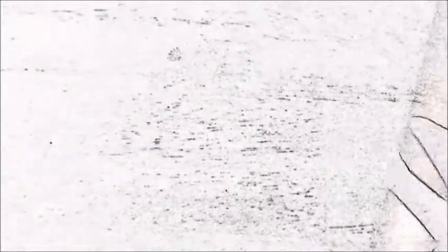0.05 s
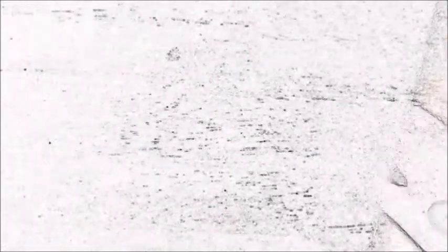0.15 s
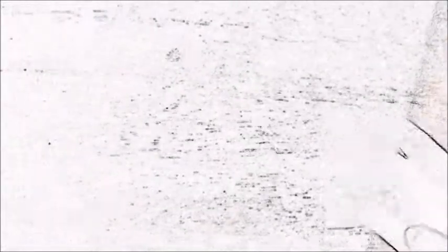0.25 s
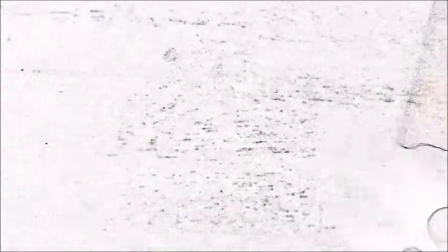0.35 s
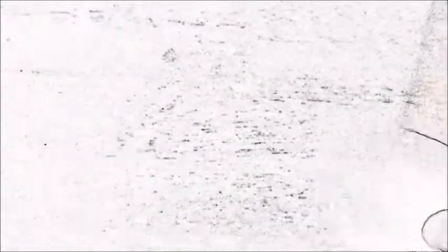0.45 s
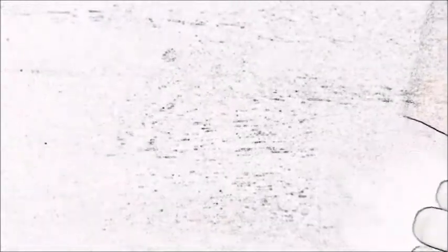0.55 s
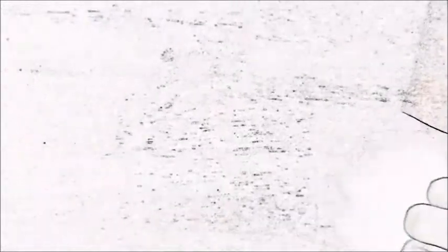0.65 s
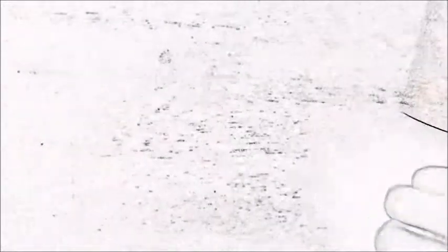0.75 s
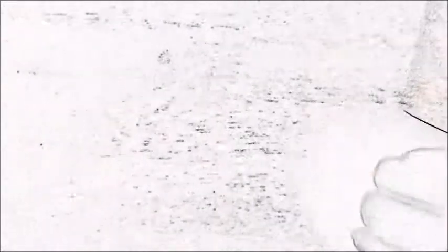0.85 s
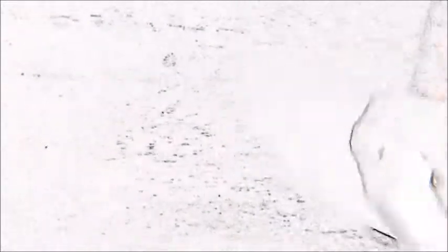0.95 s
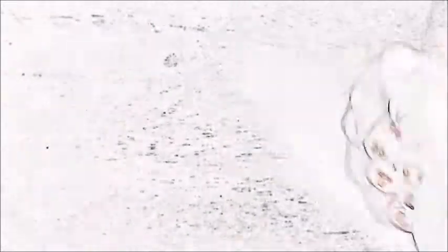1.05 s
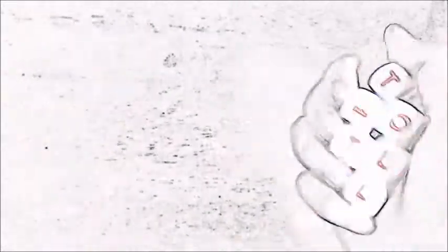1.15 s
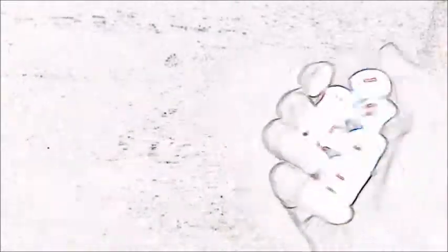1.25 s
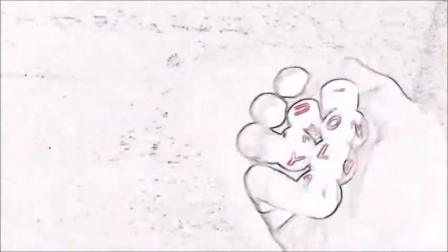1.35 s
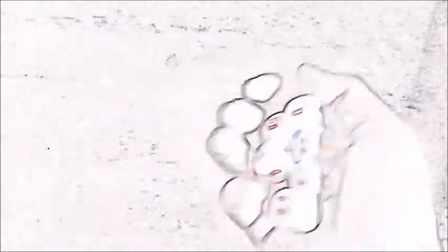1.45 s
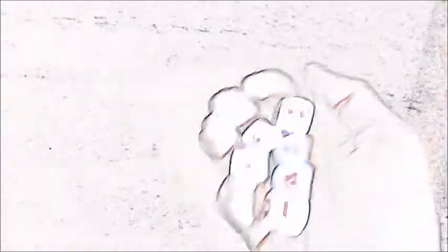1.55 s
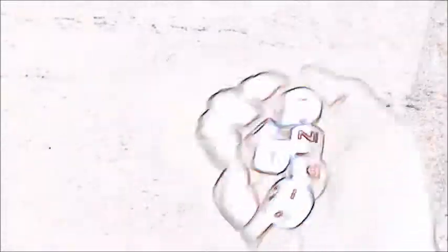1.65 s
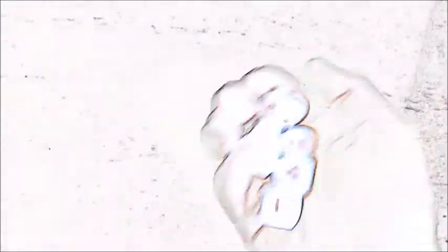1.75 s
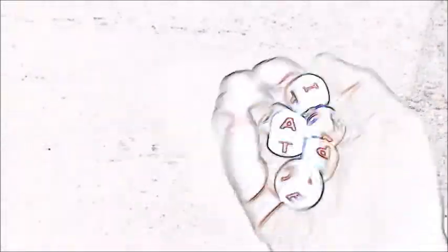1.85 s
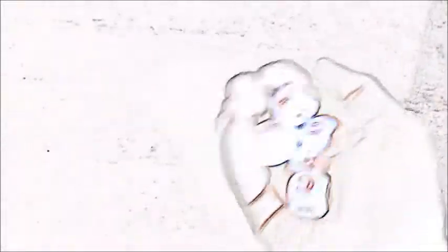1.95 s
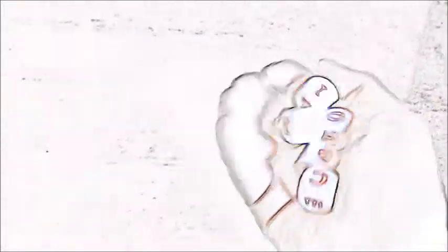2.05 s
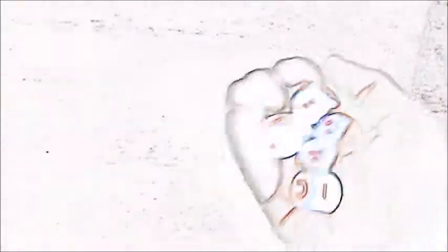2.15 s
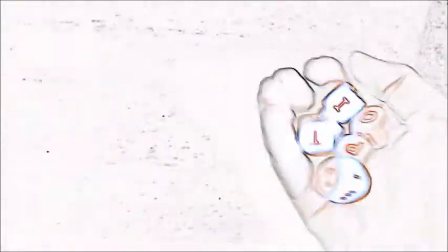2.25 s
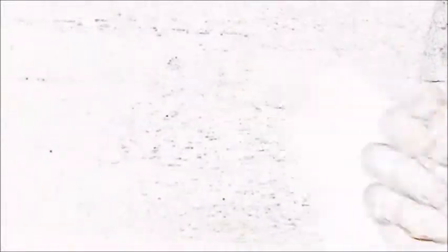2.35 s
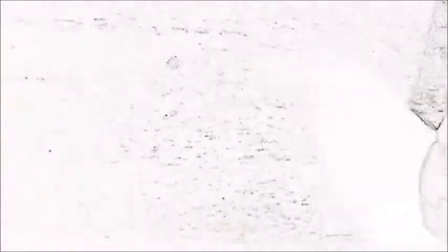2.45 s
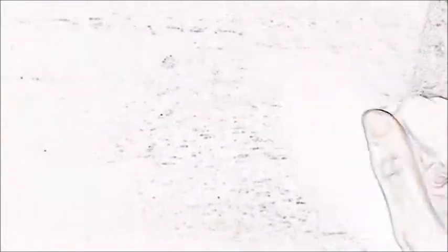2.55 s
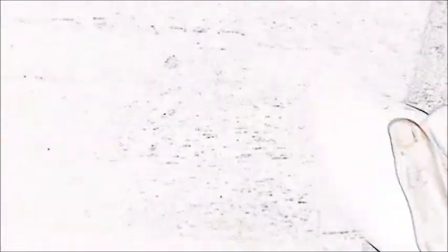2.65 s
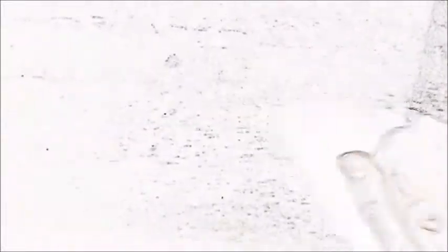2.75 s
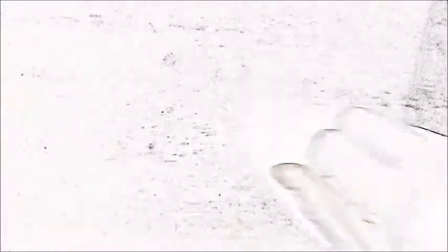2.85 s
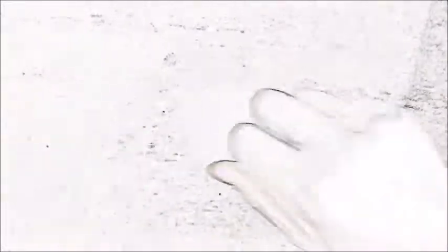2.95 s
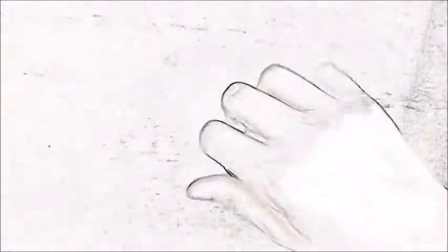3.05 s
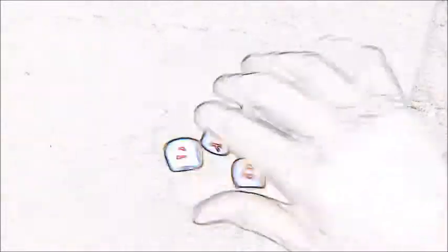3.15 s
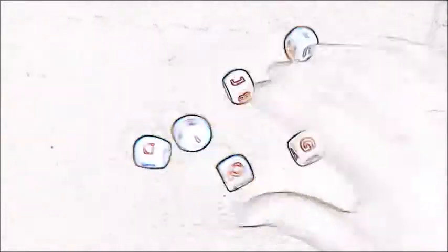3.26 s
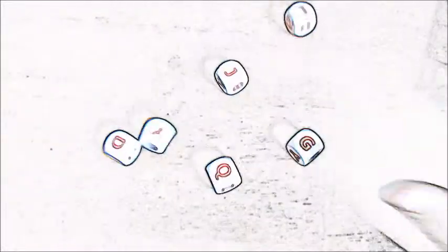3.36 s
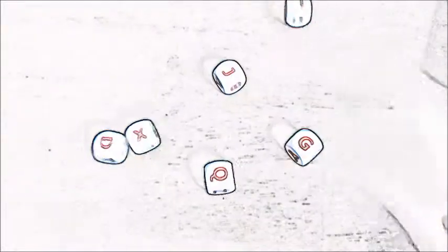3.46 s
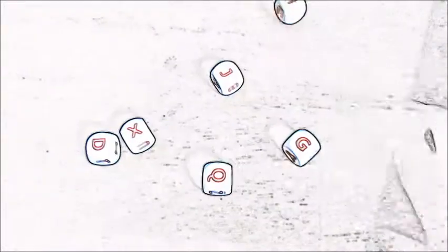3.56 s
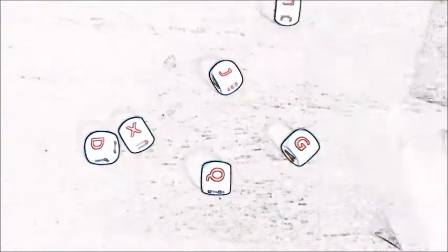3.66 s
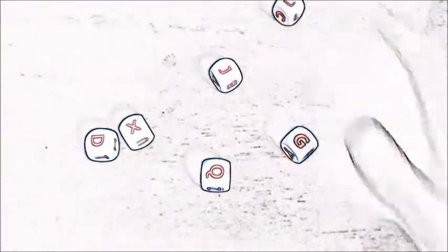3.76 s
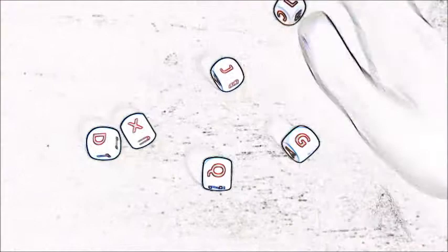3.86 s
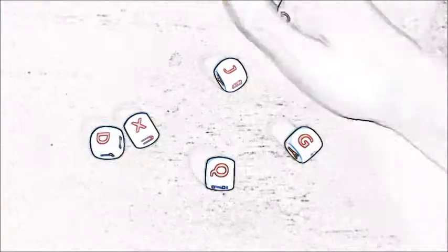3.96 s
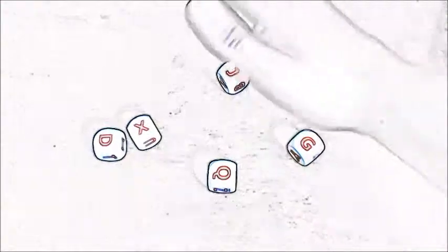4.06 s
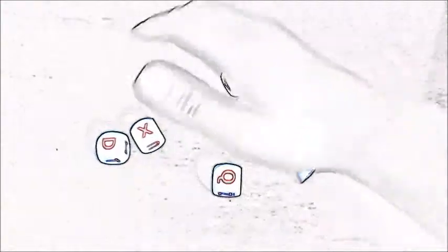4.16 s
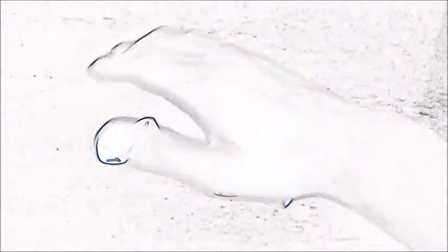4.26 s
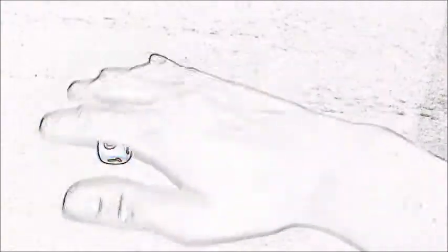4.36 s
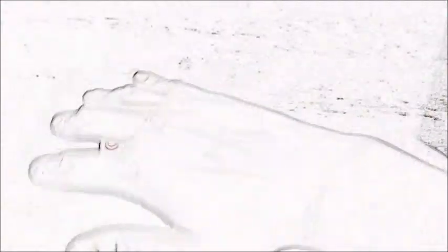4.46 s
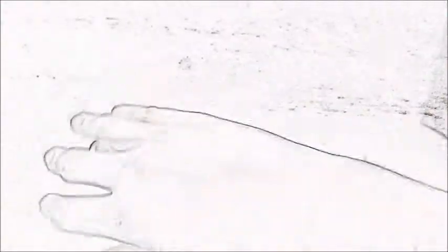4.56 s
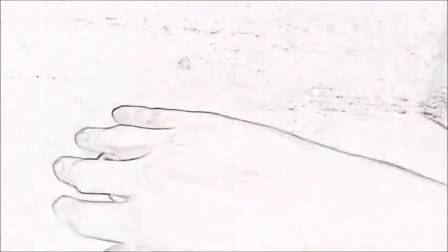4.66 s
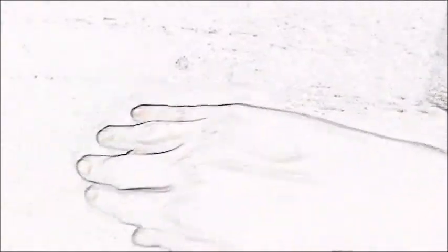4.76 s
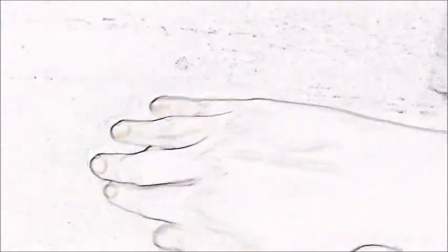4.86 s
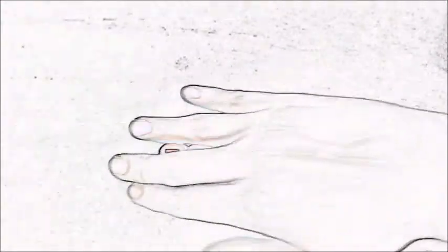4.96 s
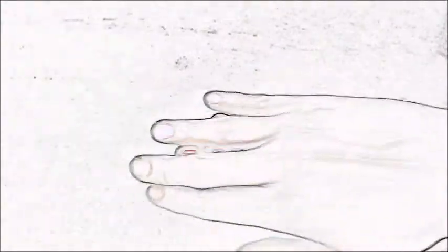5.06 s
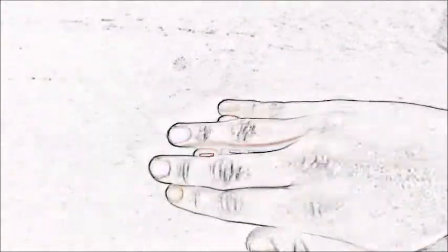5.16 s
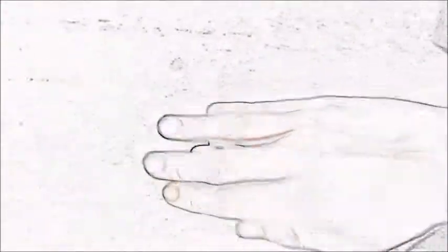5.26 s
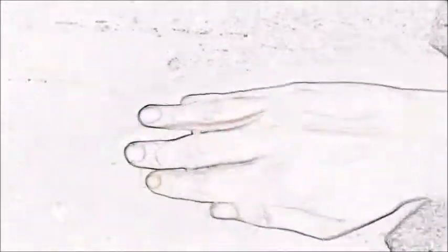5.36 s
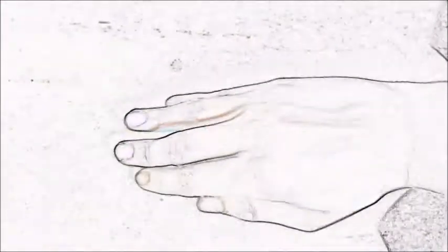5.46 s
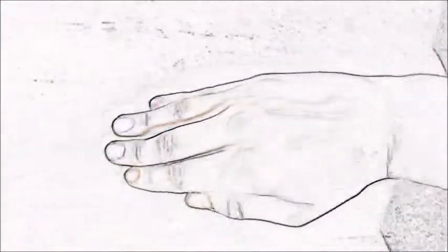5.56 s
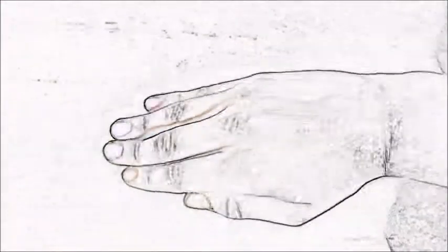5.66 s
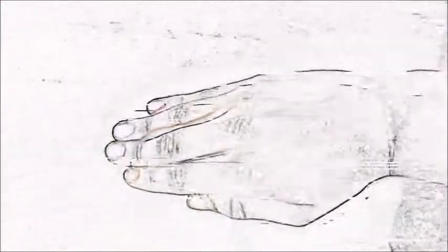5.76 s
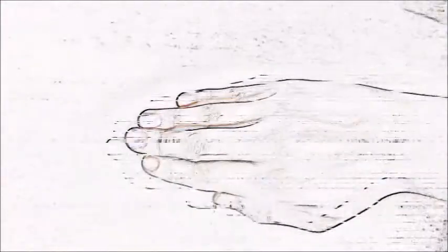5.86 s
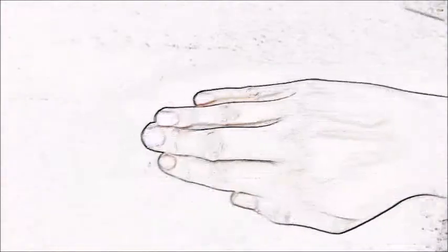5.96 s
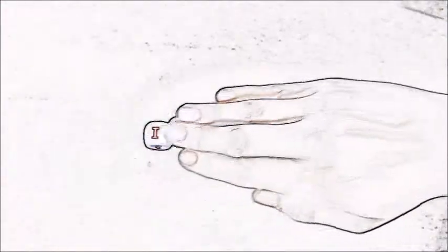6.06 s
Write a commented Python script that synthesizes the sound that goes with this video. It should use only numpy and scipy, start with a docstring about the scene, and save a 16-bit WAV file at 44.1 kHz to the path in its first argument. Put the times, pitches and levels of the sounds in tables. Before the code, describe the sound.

Small hard dice are scooped up, rattled brightly in a palm, thrown clattering onto a wooden table, then swept together and slid about under a hand.

```python
"""Small hard dice, close and indoors: scooped up, rattled in the palm, thrown on a wooden table,
then swept together and slid about under a flat hand. Clicks are short pitched wavelets, table hits
are decaying wood modes with noise bursts, and sliding is uneven noise ringing the same modes.
Skin rub, soft bumps, room air, a low rumble and thin whines lie behind; near the end, right after
an abrupt click, the level dips briefly."""
import sys
import numpy as np
from scipy import signal
from scipy.fft import rfft, irfft, next_fast_len
from scipy.io import wavfile
from scipy.ndimage import uniform_filter1d, map_coordinates

SR = 44100
rng = np.random.default_rng(int(sys.argv[2]) if len(sys.argv) > 2 else 0)


def transcribe(signal):
    """Save signal, clipped to [-1, 1], as a 16-bit WAV file at the path in sys.argv[1]."""
    frames = np.atleast_2d(signal).T
    limited = np.clip(frames, -1, 1)
    pcm = np.round(limited * 32767).astype(np.int16)
    wavfile.write(sys.argv[1], SR, pcm)


N = 269892
TIME = np.arange(N) / SR  # seconds
CRACK_HZ = 12000  # the hardest part of a contact


def amp(db):
    """Decibels to a linear gain."""
    return 10 ** (np.asarray(db) / 20)


def unit(x):
    """Scale a signal to an rms of 1."""
    return x / np.sqrt(np.mean(x ** 2) + 1e-20)


def along(points, hz):
    """Read (Hz, value) points along a log frequency axis."""
    point_hz, value = np.transpose(points)
    return np.interp(np.log(hz + 1), np.log(point_hz + 1), value)


def curves(rows):
    """One value per sample for each column; the first, a level, is silent outside the rows."""
    s, level, *columns = np.transpose(rows)
    level_curve = np.interp(TIME, s, level, -150, -150)
    return [level_curve] + [np.interp(TIME, s, column) for column in columns]


def wobble(rate):
    """A smooth random curve with rate knots a second."""
    knots = rng.standard_normal(int(N * rate / SR) + 4)
    return map_coordinates(knots, [TIME * rate])


def filtered(x, response):
    """Shape the spectrum of x by a response of frequency."""
    size = next_fast_len(N + SR // 2)
    hz = np.fft.rfftfreq(size, 1 / SR)
    return irfft(rfft(x, size) * response(hz), size)[..., :N]


def coloured(x, spectrum):
    """Filter x through (Hz, dB) points and scale it to an rms of 1."""
    return unit(filtered(x, lambda hz: amp(along(spectrum, hz))))


def above(hz, edge_hz):
    """A steep high-pass response."""
    return 1 / (1 + (edge_hz / (hz + 1)) ** 8)


def wavelets(s, hz, gain, turns):
    """Short pitched bursts around the times s: a bell-shaped swell, some turns of the pitch wide."""
    at = np.round(s * SR).astype(int)[:, None] + np.arange(-100, 100)
    cycles = (at / SR - s[:, None]) * hz[:, None]
    phase = rng.uniform(0, 2 * np.pi, (len(s), 1))
    swell = gain[:, None] * np.exp(-(cycles / turns) ** 2)
    wave = swell * np.cos(2 * np.pi * cycles + phase)
    return np.bincount(at.ravel(), wave.ravel(), N + 200)[:N]


def burst(t, hz, t60, size):
    """A dying puff of noise around one pitch; a larger grain size narrows it."""
    grain = np.hanning(size) * np.cos(2 * np.pi * hz * np.arange(size) / SR)
    noise = amp(-60 * t / t60) * rng.standard_normal(len(t))
    return np.convolve(noise, grain / np.linalg.norm(grain))[:len(t)]


# Room reverb. Each row: frequency in Hz, time to fall 60 dB in seconds.
ROOM_DECAY = [(300, 0.39), (2000, 0.22), (9000, 0.13)]


def room(x):
    """Each frequency of the room's answer dies at its own speed; every tenth of a second has its own tail."""
    out, step = np.zeros(N + SR), SR // 10
    for a in range(0, N, step):
        hz, t, noise = signal.stft(rng.standard_normal(SR // 4), SR, nperseg=128)
        decay = amp(-60 * t / along(ROOM_DECAY, hz)[:, None])
        tail = signal.istft(noise * decay, SR, nperseg=128)[1]
        wet = signal.fftconvolve(x[a:a + step], tail / np.linalg.norm(tail))
        out[a + 40:][:len(wet)] += wet  # 40 samples after the direct sound
    return out[:N]


# Colour of the room air. Each row: frequency in Hz, relative level in dB.
AIR_SPECTRUM = [(88, -13.5), (150, -18), (314, -23.5), (352, -18.5), (572, -22.5), (736, -22.5),
                (1200, -17.5), (1570, -34), (10500, -43), (11800, -42.5), (15500, -42)]
# Colour of the low rumble. Each row: frequency in Hz, relative level in dB.
RUMBLE_SPECTRUM = [(12, -33.5), (20, 8), (52, -5), (86, -12.5), (178, -15), (214, -17), (300, -17),
                   (390, -67), (660, -120)]
# Swell of the rumble. Each row: time in seconds, level in dB.
RUMBLE_LEVEL = [(0.0, -48), (0.17, -44), (1.35, -46.5), (1.45, -53.5), (2.5, -52.5), (3.1, -51.5),
                (3.22, -73), (3.55, -65), (3.8, -55.5), (4.19, -58), (5.1, -50), (5.83, -49.5), (5.9, -43),
                (6.12, -43.5)]
# Thin steady tones. Each row: pitch in Hz, level in dB before the swell, start in seconds.
WHINES = [(11795, -79, 0), (14739, -73.5, 5.85)]
AIR_DB = -60
# the whines swell with the rumble: dB per dB over the calm level
WHINE_FOLLOWS, CALM_DB = 0.35, -47


def background():
    """Room air and a wavering low rumble of filtered noise, with thin electrical whines as sines."""
    air = amp(AIR_DB) * coloured(rng.standard_normal(N), AIR_SPECTRUM)
    rumble_db, = curves(RUMBLE_LEVEL)
    rumble = amp(rumble_db) * coloured(rng.standard_normal(N), RUMBLE_SPECTRUM)
    tones = np.zeros(N)
    for hz, db, start in WHINES:
        tones += np.sqrt(2) * amp(db) * np.sin(2 * np.pi * hz * TIME) * (TIME >= start)
    return air + rumble + amp(WHINE_FOLLOWS * (rumble_db - CALM_DB)) * tones


# Skin rubbing. Each row: time in seconds, relative level in dB.
SKIN_LEVEL = [(0.0, -64.5), (0.44, -57), (0.59, -47), (0.94, -62), (1.26, -64), (1.36, -54.5), (1.6, -64),
              (1.82, -55.5), (2.5, -57), (2.75, -75), (3.1, -59), (3.4, -55), (3.75, -91), (4.1, -57.5),
              (4.71, -63), (5.3, -65.5), (5.45, -50.5), (5.63, -63), (6.12, -64.5)]
# Colour of the rub. Each row: frequency in Hz, relative level in dB.
SKIN_SPECTRUM = [(880, -34), (1500, -9), (1810, -6), (1940, -12), (2940, -11.5), (3410, -15.5), (5540, -12),
                 (16000, -37.5)]


def skin():
    """Fingers rub on dice and wood: a slightly uneven hiss."""
    grain = rng.standard_normal(N) * amp(wobble(160))
    return amp(curves(SKIN_LEVEL)[0] + 1) * coloured(grain, SKIN_SPECTRUM)


# Soft hand bumps on the table. Each row: start in seconds, level in dB, pitch in Hz,
# time to fall 60 dB in seconds, scuff level in dB.
HAND_BUMPS = [(.140, -37, 318, 0.14, -42), (0.143, -44.5, 984, 0.28, -59), (0.157, -36, 116, 0.11, -41),
              (0.315, -30.5, 94, 0.034, -71), (0.328, -30, 315, 0.06, -46),
              (0.759, -39.5, 305, 0.11, -36.5), (.797, -33, 646, 0.032, -39.5),
              (1.039, -39, 394, 0.15, -43.5), (5.718, -29, 680, 0.033, -58), (5.735, -31, 885, 0.055, -45),
              (5.752, -33.5, 477, 0.15, -56)]


def bumps():
    """A soft hand wakes one low tone at a time, blurred by a dull puff, with a small scuff on top."""
    out, t = np.zeros(N + SR), np.arange(SR // 5) / SR
    for s, db, hz, t60, scuff_db in HAND_BUMPS:
        soft_start = 1 - np.exp(-t / 0.00067)
        thud = amp(-60 * t / t60) * np.sin(2 * np.pi * hz * t) * soft_start
        puff = amp(-16.5) * burst(t, 0.94 * hz, 3.8 * t60, size=61)
        scuff = amp(scuff_db) * burst(t, 2270, 0.025, size=25)
        out[round(s * SR):][:len(t)] += amp(db) * (thud + puff) + scuff
    return out[:N]


# Table-top modes, for drags and blows alike. Each row: pitch in Hz, relative level in dB,
# time to fall 60 dB in seconds when free of the hand.
TABLE_MODES = [(234, -18.5, 0.21), (333.9, -11, 0.34), (399, -18, 0.071), (509, -16.5, 0.056),
               (733, -18, 0.029), (994, -10, 0.22), (1226.5, -9.5, 0.12), (1584, -8, 0.055),
               (1767, 2.5, 0.029), (1810, -9.5, 0.034), (1864, -19, 0.13), (2443, -15, 0.11),
               (2417, -9.5, 0.078), (2650, -10.5, 0.1), (2910, -4.5, 0.057), (3100, 1, 0.05),
               (3650, -12.5, 0.15), (3650, -3, 0.023), (4200, -42, .06), (4410, -8.5, 0.0079),
               (5240, -7, 0.036), (5470, -12.5, 0.02)]


def wood(hz, ring, spot_db):
    """The table's modes as resonances, weighted for one spot; a hand on the top shortens the ring."""
    response = 0
    for k, (mode_hz, db, t60) in enumerate(TABLE_MODES):
        width = np.log(1000) / (np.pi * t60 * ring)
        resonance = 1j * hz * width / (mode_hz * mode_hz - hz * hz + 1j * hz * width)
        response = response + (-1) ** k * amp(db + spot_db[k]) * resonance
    return response


# Drags on the wood; neighbouring rows that meet in time are stretches of one continuous drag.
# Each row: a level curve of (time in seconds, level in dB), then bass, hollow tone and treble
# in dB over that level, the treble before it follows the strength.
DRAGS = [ ([(0.12, -62), (0.142, -59.5), (0.306, -81)], 2.6, 0, -1.1), ([(0.39, -65), (0.448, -49),
         (0.484, -51.5), (0.54, -43.5), (0.62, -48), (0.72, -67)], 0, 0, 8), ([(2.968, -56), (3.035, -54.5),
         (3.05, -68)], -19, -16, 3.7), ([(3.1, -39.5), (3.254, -37.5), (3.382, -34.5), (3.5, -36)],
         -1, -23, 0), ([(3.5, -41), (3.72, -49), (3.842, -46.5), (3.94, -66.5)], -0.29, -8, 6.6),
         ([(4.05, -76), (4.09, -48), (4.182, -49), (4.266, -38), (4.33, -38.5), (4.44, -44.5)],
         -10, -14, -2.3), ([(4.44, -36.5), (4.5, -44.5), (4.58, -34), (4.66, -37.5), (4.72, -36.5),
         (4.834, -33.5), (4.94, -39.5), (5.04, -44)], -10.5, -19.5, -9.5), ([(5.04, -45.5), (5.118, -35.5),
         (5.2, -39), (5.244, -48.5), (5.3, -42.5), (5.35, -51)], -13.5, -18.5, -9.5), ([(5.35, -43),
         (5.396, -38.5), (5.43, -44.5), (5.46, -34.5), (5.54, -38.5), (5.706, -49.5), (5.76, -49)],
         -7, -11, -9.5), ([(5.85, -40), (5.91, -48.5), (6.12, -65.5)], -6.5, -24, 1)]
# Colour of the gritty hiss. Each row: frequency in Hz, relative level in dB.
GRIT_SPECTRUM = [(290, -53), (500, -17.5), (782, -16.5), (961, -3.5), (1500, -1), (1780, -13.5),
                 (1960, -9.5), (2440, -2.5), (3180, -14.5), (3460, -15), (4050, -10.5), (9000, -36),
                 (11700, -63), (19800, -120)]
# a stronger drag is brighter: extra treble dB per dB over the brisk level
BRIGHTEN, BRISK_DB = 0.58, -41.5
HOLLOW_HZ, HOLLOW_WIDE_HZ = 970, 158  # the air under the cupped hand


def slide():
    """Dragged dice catch on the grain: uneven small slips ring the table over a gritty hiss."""
    slips = rng.standard_normal(N) * amp(2.2 * wobble(300) + 1.1 * wobble(40))
    # the dice wander over spots that favour different modes
    spots = 3.5 * rng.standard_normal((3, len(TABLE_MODES)))
    near = amp(6 * np.array([wobble(5) for _ in spots]))
    near = near / near.sum(axis=0)
    ringing = np.zeros(N)
    for share, spot_db in zip(near, spots):
        ringing += filtered(slips * share, lambda hz: wood(hz, 0.75, spot_db))
    ringing = unit(ringing)
    grit = coloured(slips, GRIT_SPECTRUM)

    # the grit takes a larger part in the higher bands
    low = unit(filtered(ringing + 0.3 * grit, lambda hz: above(hz, 210) - above(hz, 620)))
    mid = unit(filtered(ringing + 0.62 * grit, lambda hz: above(hz, 430) - above(hz, 2160)))
    high = unit(filtered(ringing + 1.84 * grit, lambda hz: above(hz, 2330) / (1 + (hz / 5000) ** 3)))
    hollow = unit(filtered(grit, lambda hz: 1 / (1 + ((hz - HOLLOW_HZ) / HOLLOW_WIDE_HZ) ** 2)))

    out = np.zeros(N)
    for level_curve, bass_db, hollow_db, treble_db in DRAGS:
        db, = curves(level_curve)
        touch = uniform_filter1d((db > -140) * 1., size=200)  # each stretch fades in and out softly
        bright_db = treble_db + BRIGHTEN * (db - BRISK_DB)
        mix = mid + amp(bass_db) * low + amp(hollow_db) * hollow + amp(bright_db) * high
        out += touch * amp(db) * mix
    return out


# Small tumbles, one row: first level in dB, fading in dB per second, typical pitch in Hz, mean treble in dB.
TUMBLE_BLOWS = (-26, 24, 2498, -46)
# The roll, one row: start in seconds, end in seconds.
TUMBLE_SPAN = (3.16, 3.85)


def tumbles(count):
    """Small chance blows, weaker as the dice lose speed."""
    start, end = TUMBLE_SPAN
    first_db, fade_db, hz, treble_db = TUMBLE_BLOWS
    s = rng.uniform(start, end, size=count)
    level_luck, pitch_luck, treble_luck = rng.standard_normal((3, count))
    db = first_db - fade_db * (s - start) + 4 * level_luck
    return zip(s, db, hz * np.exp(0.067 * pitch_luck), treble_db + 5 * treble_luck)


def strike(db, centre_hz, treble_db, ring_db, t, modes):
    """One blow: the spot favours modes near one pitch; a woody snap, a bright tick and a thin crack start it."""
    hz = np.transpose(TABLE_MODES)[0]
    near_pitch = np.maximum(-22 * np.log2(hz / centre_hz) ** 2, -9)
    favour_db = np.where(hz > 600, near_pitch, -8)
    ring = amp(favour_db + 3.5 * rng.standard_normal(hz.shape)) @ modes
    snap = burst(t, 1.247 * centre_hz, 0.016, size=21)
    crack = amp(-16.5) * burst(t, CRACK_HZ, 0.0027, size=7)
    tick = burst(t, 4140, 0.039, size=13) + crack
    return amp(db) * (amp(ring_db) * ring + amp(-5.0) * snap + amp(treble_db - 11.0) * tick)


# The clear hits of die on table. Each row: start in seconds, level in dB, favoured pitch in Hz,
# relative treble in dB.
TABLE_HITS = [(3.0844, 0.5, 2060, -11.5), (3.0931, -12, 1960, -24), (3.104, -8.5, 1510, -37),
              (3.1478, 1, 1990, -30), (3.1588, -7.5, 1820, -13), (3.1645, -6, 1910, -32),
              (3.18, -10.5, 2030, -22), (3.194, -11.5, 1980, -37), (3.2127, -11.5, 1900, -21),
              (3.227, -7.5, 2150, -12), (3.236, -7, 1840, -29), (3.2453, -34, 2440, -24),
              (3.272, -7, 1880, -26), (3.285, -10, 2120, -4), (3.2924, -11.5, 2570, -26),
              (3.3, -7, 1910, -39), (3.3162, -34, 1880, -29), (3.3334, -13, 2005, 3.5),
              (3.3455, -14, 2780, -2), (3.3586, -10, 2090, -36), (3.385, -13.5, 2840, -9),
              (3.397, -10.5, 2430, -8), (3.4238, -8.5, 2900, -25), (3.433, -15.5, 2530, 1.5),
              (3.4415, -22, 2450, -22), (3.4554, -16.5, 2470, -26), (3.467, -17.5, 3200, -2),
              (3.4911, -10.5, 2970, -7), (3.517, -21, 2520, 1.5), (3.556, -16, 2860, -25),
              (3.5943, -21.5, 2860, -14), (3.6189, -18, 2730, -9), (3.7048, -29.5, 2420, -37),
              (3.7297, -30, 1820, -30), (3.7567, -29.5, 2820, -30), (3.781, -40, 2070, -31),
              (3.7996, -29, 2420, -39), (3.824, -27, 1190, -17.5), (3.8338, -24.5, 2500, -10),
              (3.846, -30, 2080, -29), (4.4489, -12.5, 2250, -8), (4.5294, -17.5, 2130, -28),
              (4.5356, -15.5, 2340, -24), (4.549, -20.5, 1380, -1), (4.5868, -13, 2700, -31),
              (4.6987, -16, 2130, -8), (5.4553, -21, 1750, -11), (5.763, -8.5, 2200, -42),
              (5.7914, -3.5, 2210, -42), (5.7978, -11, 2270, -35)]
# ring under the blow; once the hand lies on the top it rings less
RING_DB, PALM_DOWN_S, PALM_DAMP_DB = -10.5, 4.0, -4


def knocks():
    """Dice land, bounce and tumble on the table, which radiates no deep bass."""
    out, t = np.zeros(N + SR), np.arange(SR // 3) / SR
    hz, level, t60 = np.transpose(TABLE_MODES)[:, :, None]
    envelope = amp(level - 60 * t / t60) * (1 - np.exp(-t / 0.0001)) * (1 - t / t[-1])
    modes = envelope * np.sin(2 * np.pi * hz * t)
    for s, *blow in list(TABLE_HITS) + list(tumbles(count=30)):
        ring_db = RING_DB + PALM_DAMP_DB * (s > PALM_DOWN_S)
        out[round(s * SR):][:len(t)] += strike(*blow, ring_db, t, modes)
    return filtered(out[:N], lambda hz: above(hz, 210))


# Tiny contacts in the palm. Each row: time in seconds, relative level in dB, typical pitch in Hz.
PALM_RATTLE = [(1.27, -62.5, 2300), (1.31, -37, 2520), (1.37, -43, 2900), (1.544, -43.5, 2700),
               (1.6, -39.5, 3800), (1.767, -31.5, 3500), (1.868, -47, 3590), (1.899, -38.5, 3900),
               (2.08, -40.5, 3600), (2.24, -41, 3870), (2.33, -97, 3800), (2.378, -38, 3080),
               (2.45, -56, 3200), (2.66, -63, 3000)]


def jostle():
    """Many small contacts between the loud ones: a few stand out, the rest merge into a palm-tuned rub."""
    db, hz = curves(PALM_RATTLE)
    out = np.zeros(N)
    # count, spread of levels in dB, layer level in dB, pitch scatter, width in turns
    for count, spread_db, level_db, scatter, turns in [(700, 1.6, -6, 0.087, 0.65), (6000, 1.8, -11, 0.14, 2.1)]:
        s = rng.uniform(PALM_RATTLE[0][0], PALM_RATTLE[-1][0], size=count)
        pitch = hz[(s * SR).astype(int)] * np.exp(scatter * rng.standard_normal(count))
        contacts = wavelets(s, pitch, amp(spread_db * rng.exponential(size=count)), turns)
        out += amp(db + level_db) * contacts / np.std(contacts[db > -140])
    return out


# Sharp clicks: dice meeting, and in the last row an abrupt click just before the level dips.
# Each row: time of the first touch's middle in seconds, level in dB, pitch in Hz, relative treble in dB.
SHARP_CLICKS = [(0.433, -13, 4200, -36), (0.512, -13.5, 2320, -31), (0.504, -22, 2140, -25),
                (0.5317, -0.5, 3660, -26.5), (0.54, -9, 3550, -41), (0.5516, -24, 2970, -25),
                (0.571, -29, 3000, -21), (0.6075, -13, 3600, -42), (0.644, -22.5, 3400, -34),
                (1.241, -34, 2350, -25), (1.266, -35, 2200, -35), (1.316, -17.5, 2830, -25),
                (1.3578, -1.5, 3830, -28), (1.3672, -8, 4200, -37), (1.372, -10, 3900, -46),
                (1.3751, -2, 2960, -22), (1.393, -15.5, 3330, -39), (1.404, -23, 2770, -40),
                (1.41, -20, 2900, -40), (1.4474, -21, 3260, -31), (1.4373, -15, 3300, -20.5),
                (1.4876, -18.5, 4140, -23), (1.5356, -17.5, 2730, -23), (1.5866, -17.5, 3470, -40),
                (1.61, -15, 3560, -38), (1.6135, -4, 4230, -14.5), (1.62, -19, 4910, -7),
                (1.6224, -12.5, 3560, -14), (1.632, -19, 3990, -18), (1.639, -4.5, 5100, -21),
                (1.6444, -6, 5530, -23), (1.65, -11.5, 3170, -27), (1.6557, -12, 4100, -40),
                (1.6863, -21, 3350, -20), (1.6989, -8, 3530, -19), (1.7071, -11, 3400, -29),
                (1.7111, -5.5, 3580, -21), (1.7135, -7.5, 4550, -16), (1.717, -6, 5400, -24),
                (1.7255, -9, 3950, -28), (1.7378, -19.5, 3550, -10), (1.7472, -13, 3660, -9),
                (1.7495, -13.5, 4230, -26), (1.797, 0.5, 3740, -37), (1.8065, -6.5, 3700, -42),
                (1.8107, -13, 3750, -46), (1.8157, -10.5, 3600, -30), (1.8321, -19, 3850, -15),
                (1.8677, -16.5, 3270, -33), (1.8905, -20, 3760, -40), (1.904, -15, 3510, -44),
                (1.9171, 1, 4000, -20), (1.9335, -15, 4250, -16), (1.938, -10.5, 4220, -22),
                (1.971, -25, 4220, -24), (1.9907, -30, 4200, -31), (2.0135, -3, 4360, -24),
                (2.021, -9, 3830, -19), (2.025, -3.5, 4430, -31), (2.028, -10, 4130, -22),
                (2.0321, -7.5, 4150, -18), (2.0455, -12, 3300, -32), (2.057, -18, 4080, -41),
                (2.0833, -16.5, 3160, -13.5), (2.095, -15, 4020, -37), (2.1, -16.5, 4020, -39),
                (2.1315, -19, 3400, -27), (2.1474, -14.5, 3480, -23), (2.1734, -16.5, 3800, -47),
                (2.1797, -14, 3450, -35), (2.1862, -20, 4000, -50), (2.2014, -19, 3800, -44),
                (2.2188, -14, 3900, -45), (2.223, -13, 3850, -36), (2.2362, -23, 3970, -39),
                (2.2801, -18, 4000, -31), (2.295, -19, 3860, -33), (2.3036, -14, 4600, -33),
                (2.3151, -12.5, 3300, -33), (2.3363, -15.5, 3860, -49), (2.4038, -10, 3030, -41),
                (2.4103, -14.5, 2800, -45), (2.4255, -10, 3760, -37), (2.4283, -15, 3760, -20),
                (2.4328, -12, 4170, -27), (2.4365, -7, 5130, -33), (2.4477, -5.5, 3800, -15.5),
                (2.499, -24.5, 2730, -26), (2.598, -35.5, 3080, -28), (2.9651, -11.5, 3370, -32.5),
                (4.2633, -18, 4340, -23), (4.3092, -23, 2820, -26), (4.3798, -33, 3700, -36),
                (4.5319, -16, 4880, -26), (4.5391, -18, 2820, -12), (4.5884, -12, 3270, -37),
                (4.6635, -19, 2900, -27), (4.7683, -18, 4170, -30), (5.0409, -32, 3270, -31),
                (5.0644, -19, 4330, -19), (5.2687, -30, 3840, -32), (5.3041, -23.5, 3400, -21),
                (5.397, -9.5, 3140, -33), (5.4558, -10, 4200, -25), (5.473, -20, 3600, -23),
                (5.4978, -20, 2410, -22), (5.736, -39, 4140, -30), (5.8166, -3, 2500, -19.5)]
# each click is trailed by another, usually weaker: delay scatter, mean level change, level scatter
REBOUND_S, REBOUND_DB, REBOUND_SPREAD_DB = 0.006, -9.5, 2.5
CRACK_DB, CRACK_GROWS = -3.5, 1.8  # crack over the treble; a harder hit cracks more than it grows


def clicks():
    """A first touch with a low pat, a sharp edge and a thin crack at once, then a slightly later, stronger pulse."""
    s, db, hz, treble_db = np.transpose(SHARP_CLICKS)
    delay_luck, level_luck, pitch_luck = rng.standard_normal((3, len(s)))
    s = np.append(s, s + 0.00084 + REBOUND_S * np.abs(delay_luck))
    db = np.append(db, db + REBOUND_DB + REBOUND_SPREAD_DB * level_luck)
    hz = np.append(hz, hz * np.exp(0.26 * pitch_luck))
    treble_db = np.tile(treble_db, 2)
    touch = wavelets(s, hz, amp(db - 5.0), turns=0.63)
    later_pulse = wavelets(s + 0.000494, hz, amp(db - 2.5), turns=1.0)  # pushed air
    pat = wavelets(s, 0.47 * hz, amp(db - 23), turns=1.0)  # from the palm
    edge_hz = 7300 * np.exp(0.1 * rng.standard_normal(len(s)))
    edge = wavelets(s, edge_hz, amp(db + treble_db + 8.5), turns=1.0)
    crack_gain = amp(CRACK_GROWS * db + treble_db + CRACK_DB)
    crack = wavelets(s, np.full(len(s), CRACK_HZ), crack_gain, turns=0.85)
    return touch + later_pulse + pat + edge + crack


def scene():
    """Mix the layers; the click, rattle and table sounds also excite the room."""
    palm = clicks() + jostle()
    table = knocks() + bumps()
    reverb = room(amp(-15) * palm + amp(-11.5) * table)
    return (palm + table + reverb + slide() + skin() + background())[None]


# The brief dip, one row: start in seconds, end in seconds, gain in dB.
DIP = (5.8185, 5.85, -30)
TOP_HZ = 15850  # band limit


def record(dry):
    """A dull microphone with a bass cut, a brief level dip, saturation toward full scale, then the band limit."""
    x = filtered(dry, lambda hz: 1 / (1 + (33 / (hz + 1)) ** 4) / (1 + (hz / 11000) ** 2))
    start, end, dip_db = DIP
    x = x * np.where((TIME > start) & (TIME < end), amp(dip_db), 1)
    x = x / (1 + np.abs(x) ** 8) ** (1 / 8)
    return filtered(x, lambda hz: 1 / (1 + (hz / TOP_HZ) ** 300))


dry = scene()
out = record(dry)
transcribe(out)
```